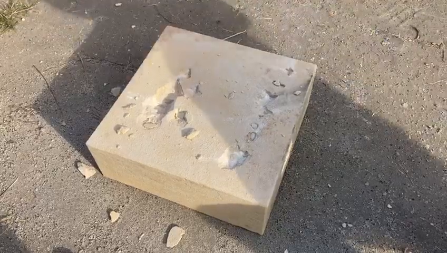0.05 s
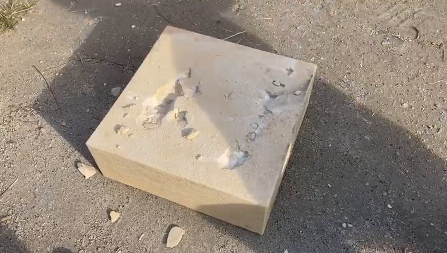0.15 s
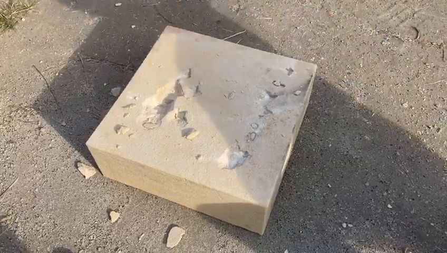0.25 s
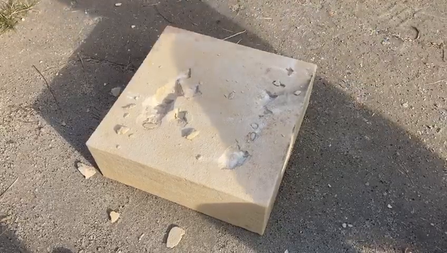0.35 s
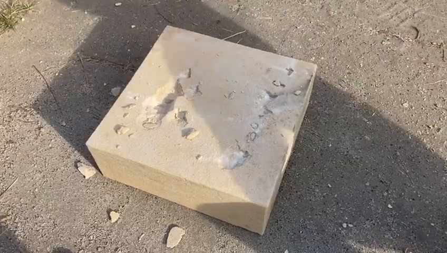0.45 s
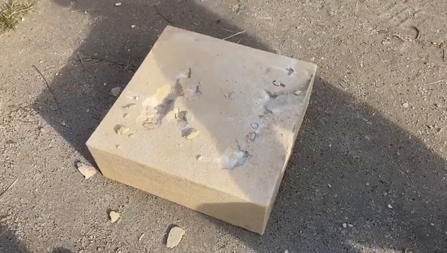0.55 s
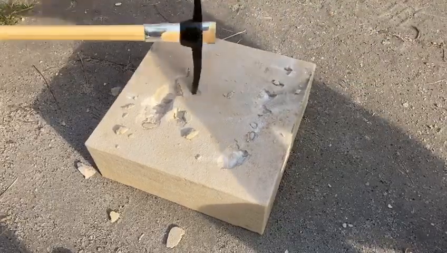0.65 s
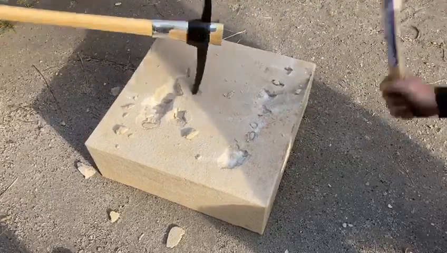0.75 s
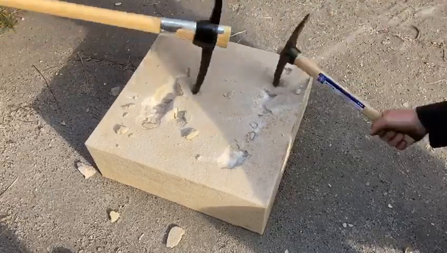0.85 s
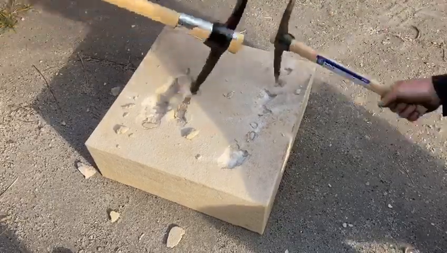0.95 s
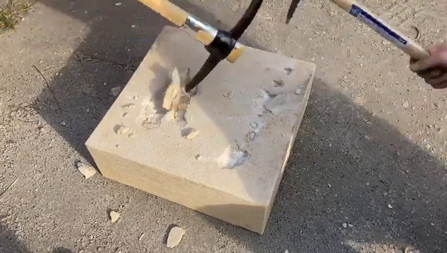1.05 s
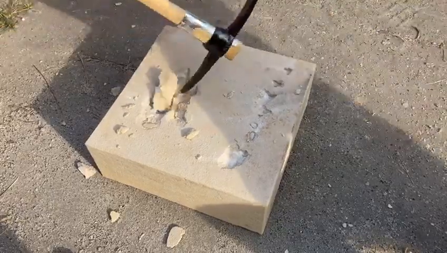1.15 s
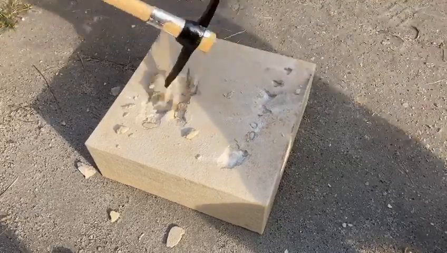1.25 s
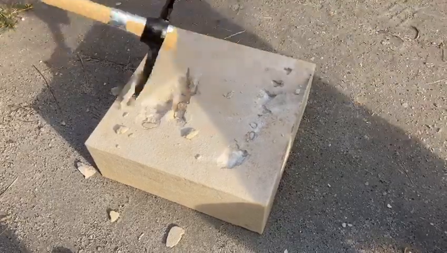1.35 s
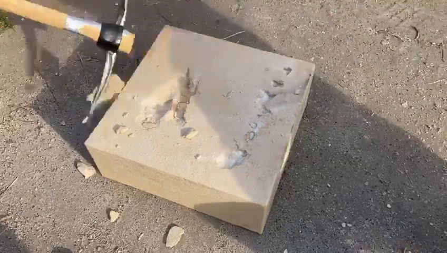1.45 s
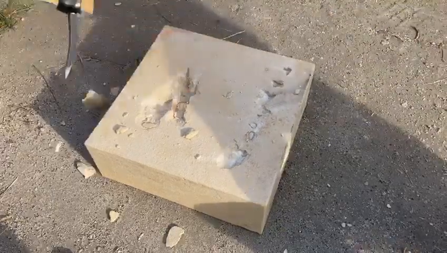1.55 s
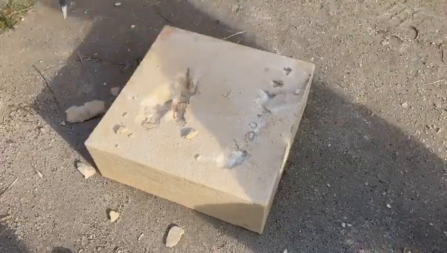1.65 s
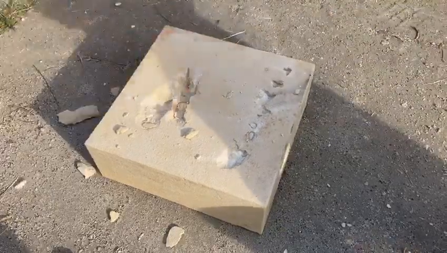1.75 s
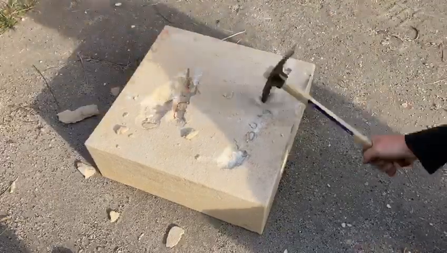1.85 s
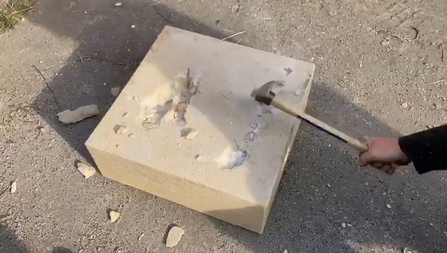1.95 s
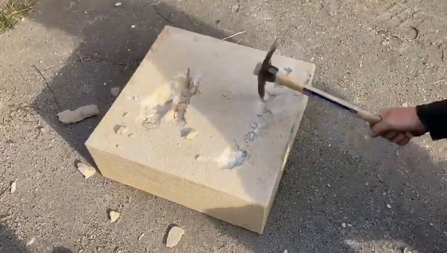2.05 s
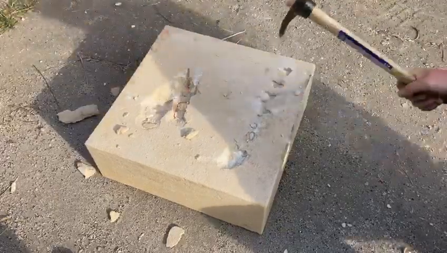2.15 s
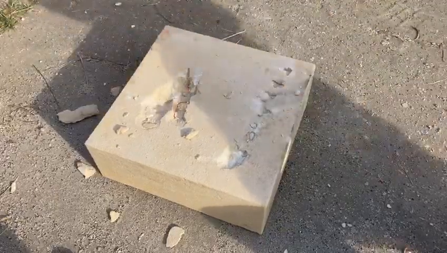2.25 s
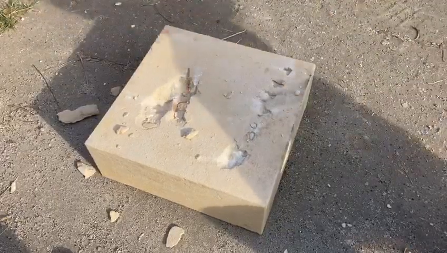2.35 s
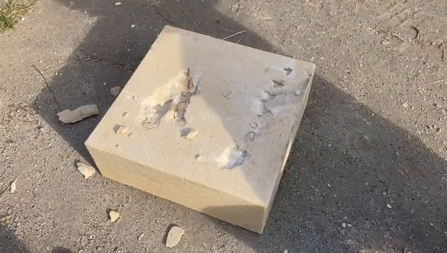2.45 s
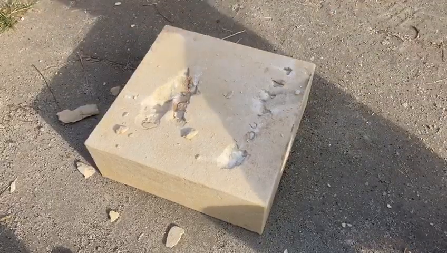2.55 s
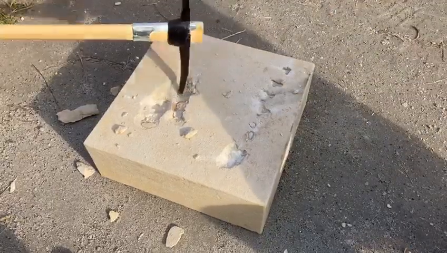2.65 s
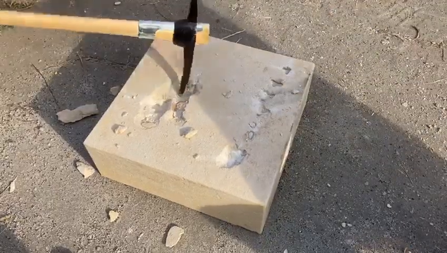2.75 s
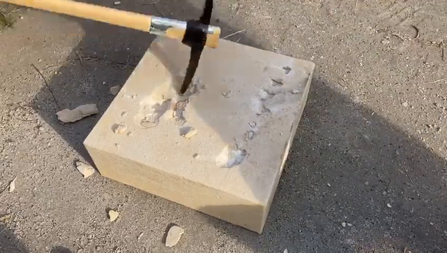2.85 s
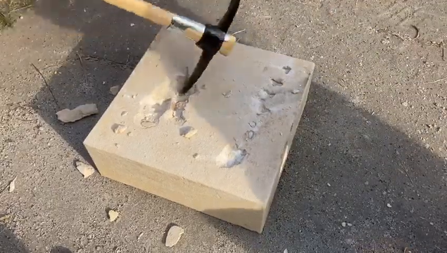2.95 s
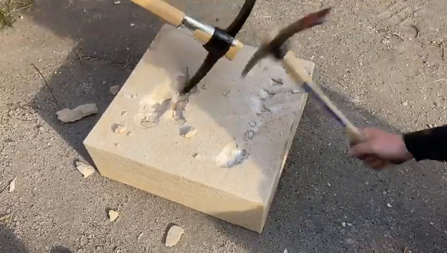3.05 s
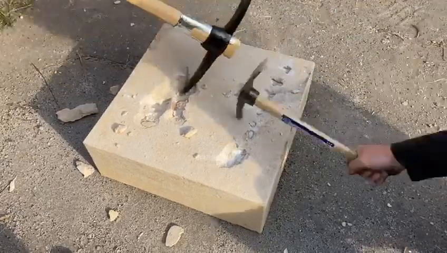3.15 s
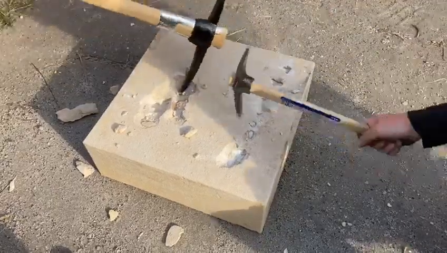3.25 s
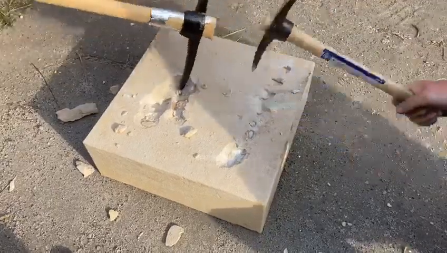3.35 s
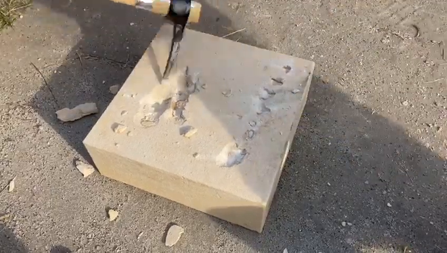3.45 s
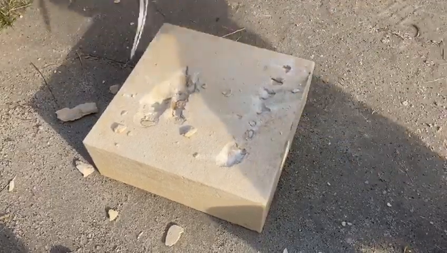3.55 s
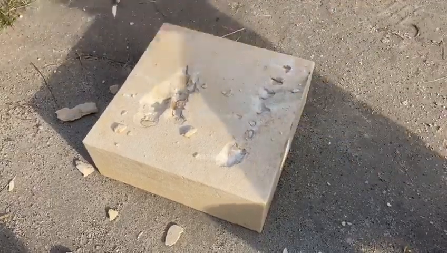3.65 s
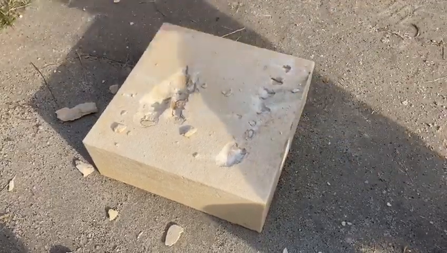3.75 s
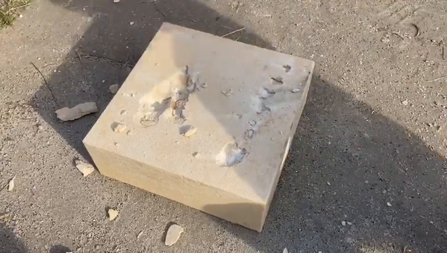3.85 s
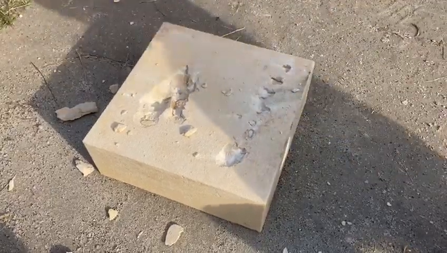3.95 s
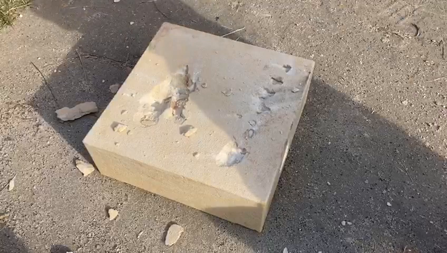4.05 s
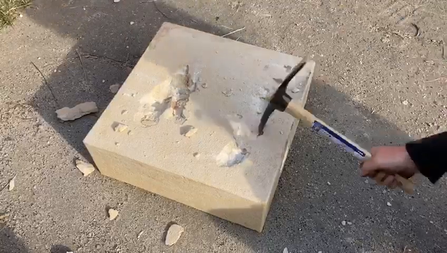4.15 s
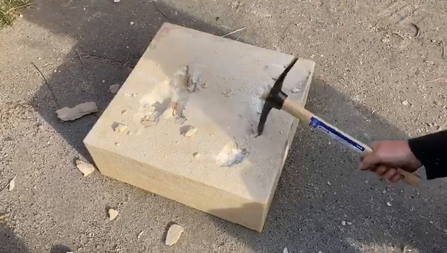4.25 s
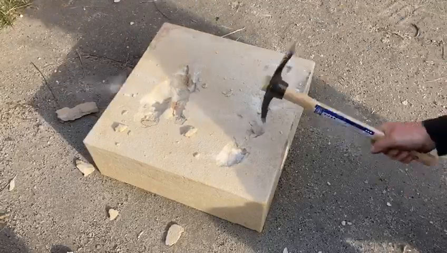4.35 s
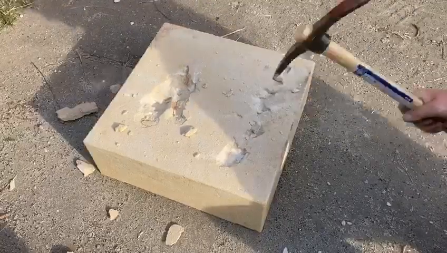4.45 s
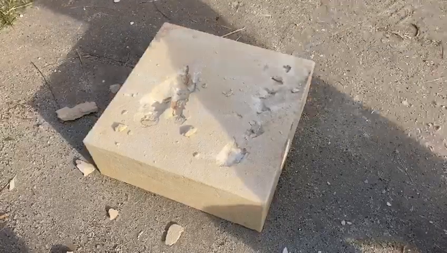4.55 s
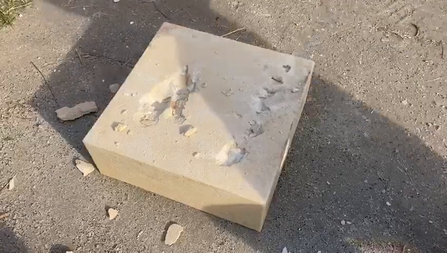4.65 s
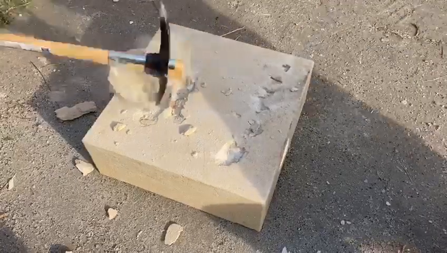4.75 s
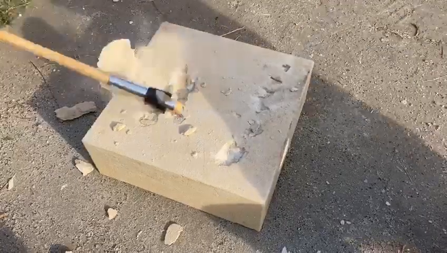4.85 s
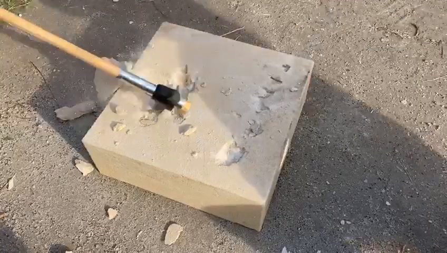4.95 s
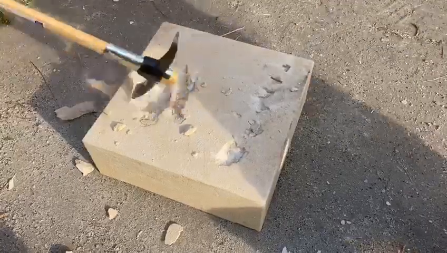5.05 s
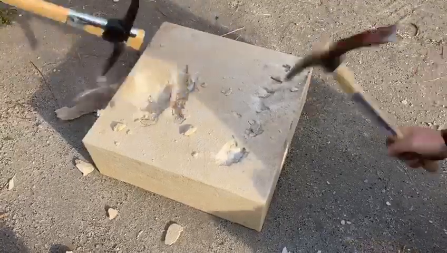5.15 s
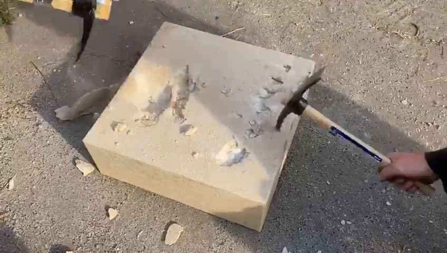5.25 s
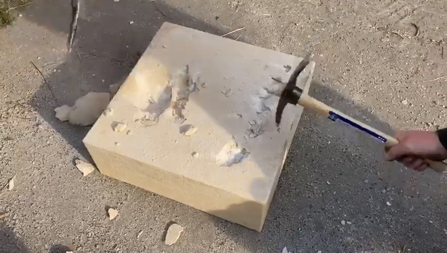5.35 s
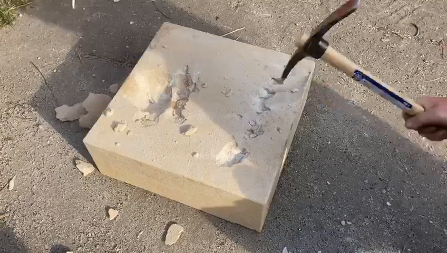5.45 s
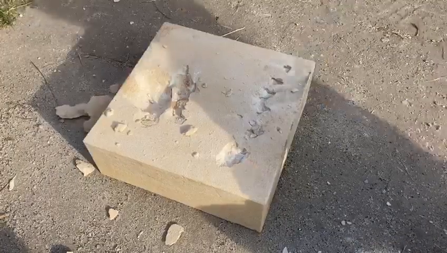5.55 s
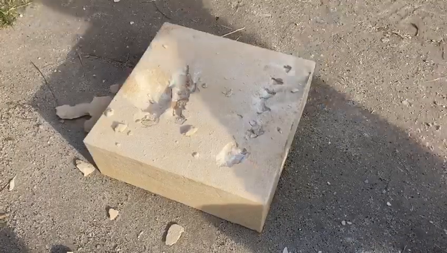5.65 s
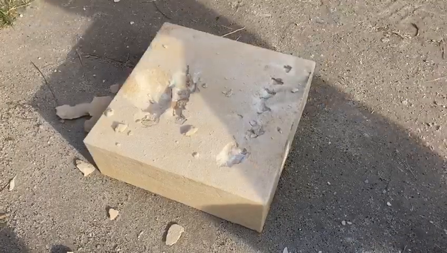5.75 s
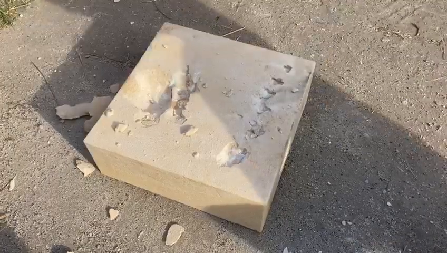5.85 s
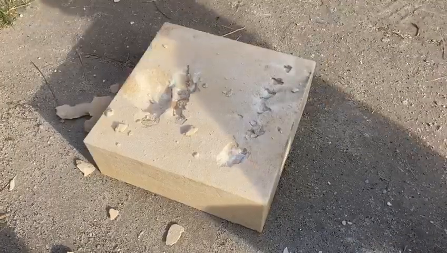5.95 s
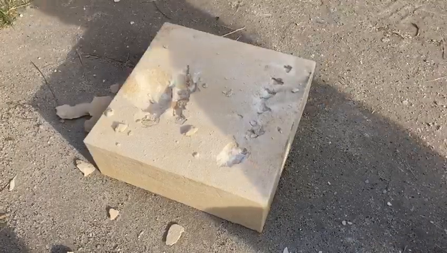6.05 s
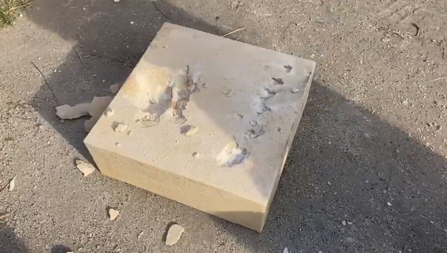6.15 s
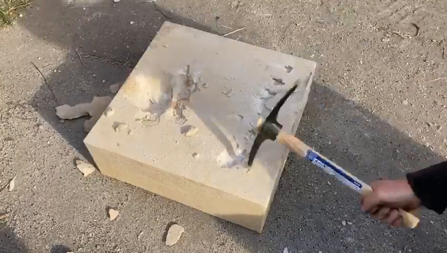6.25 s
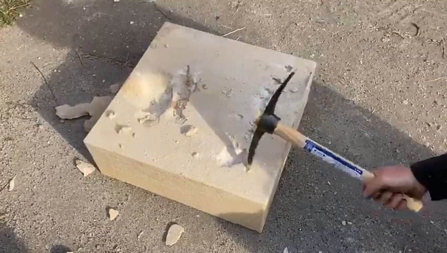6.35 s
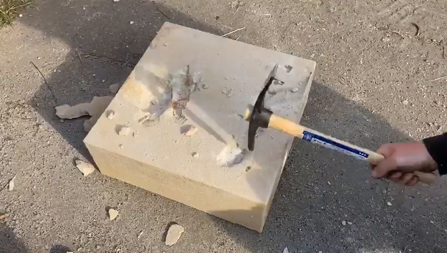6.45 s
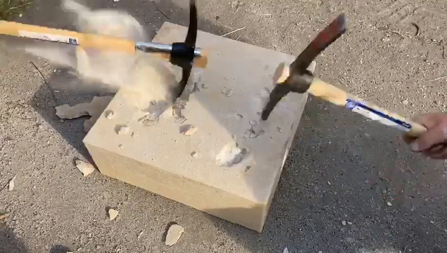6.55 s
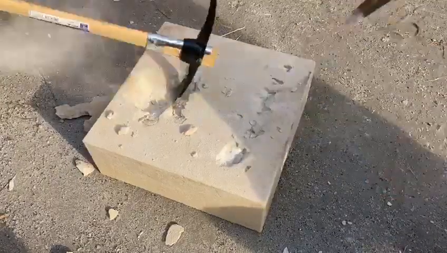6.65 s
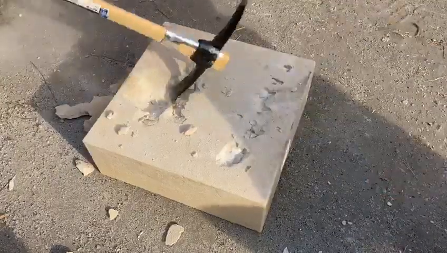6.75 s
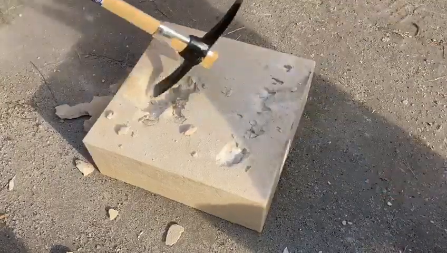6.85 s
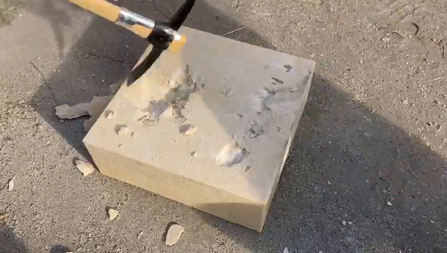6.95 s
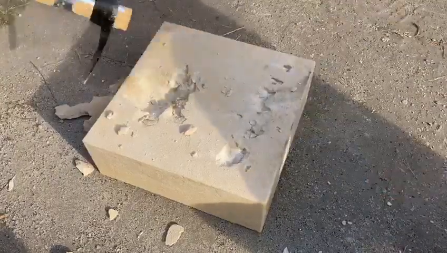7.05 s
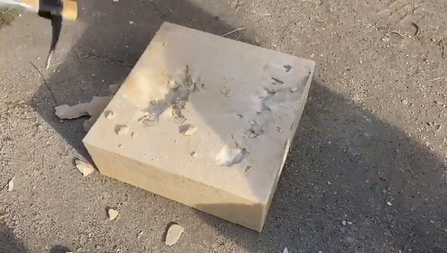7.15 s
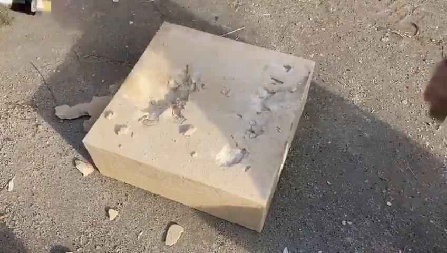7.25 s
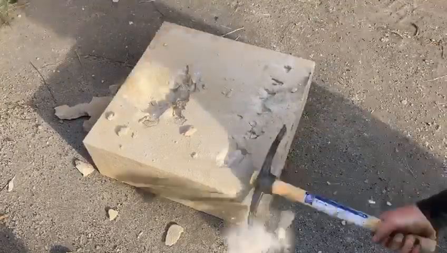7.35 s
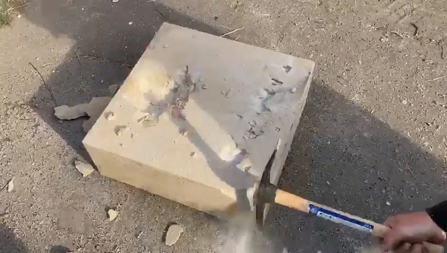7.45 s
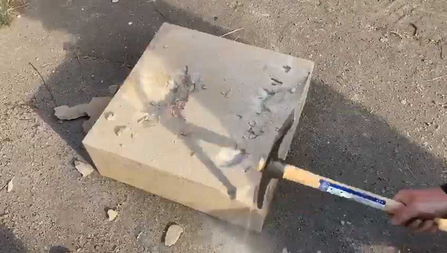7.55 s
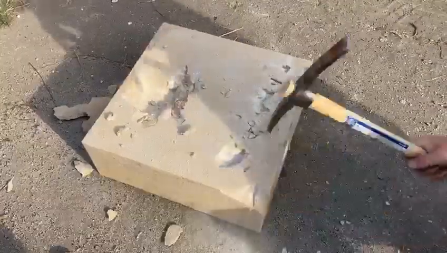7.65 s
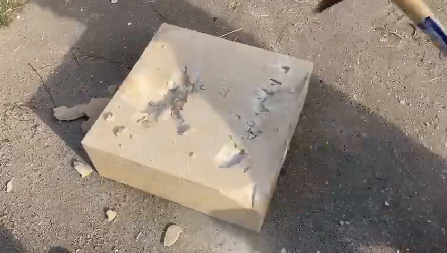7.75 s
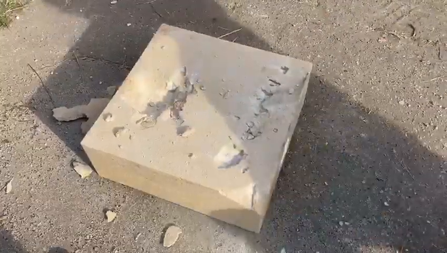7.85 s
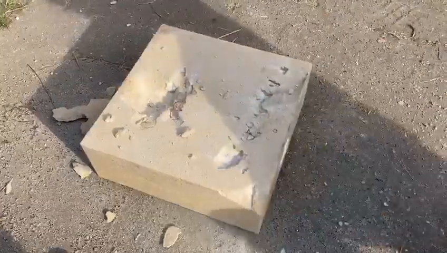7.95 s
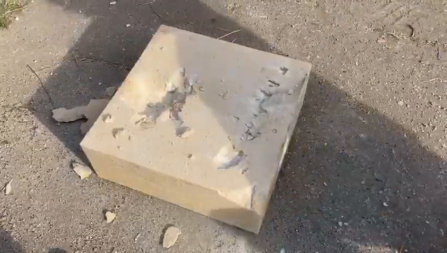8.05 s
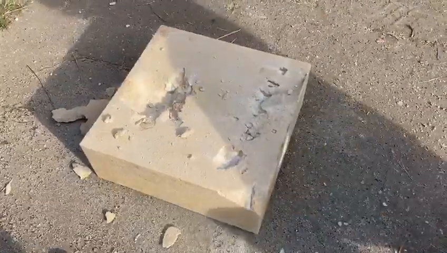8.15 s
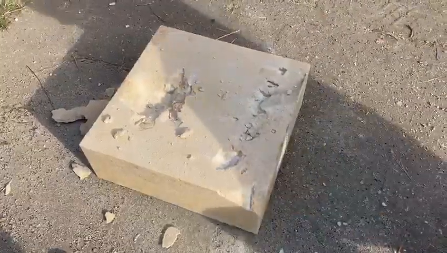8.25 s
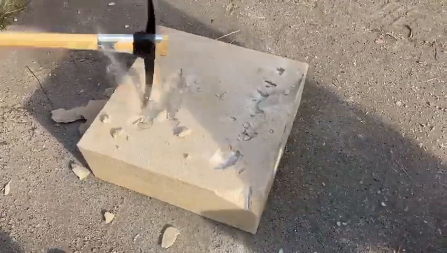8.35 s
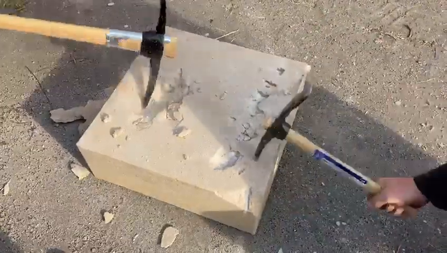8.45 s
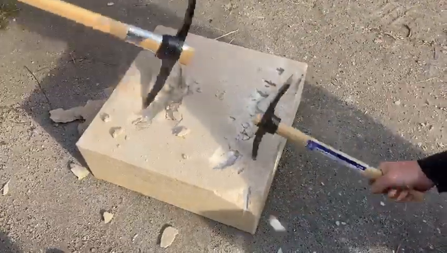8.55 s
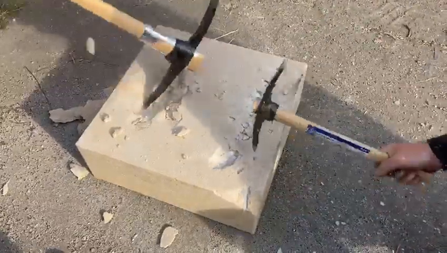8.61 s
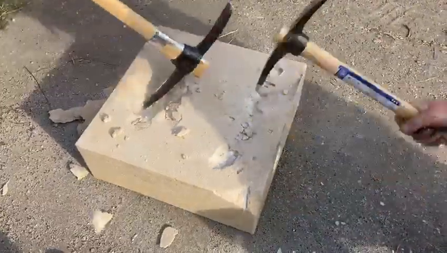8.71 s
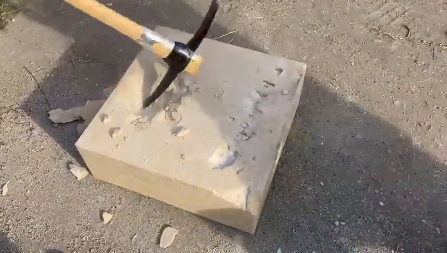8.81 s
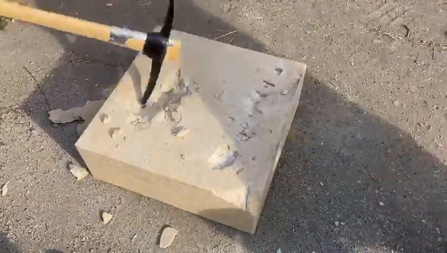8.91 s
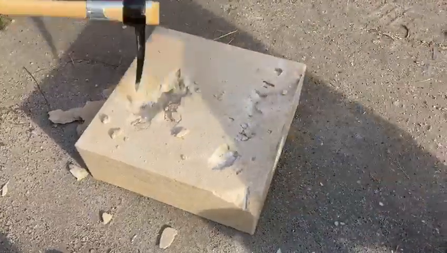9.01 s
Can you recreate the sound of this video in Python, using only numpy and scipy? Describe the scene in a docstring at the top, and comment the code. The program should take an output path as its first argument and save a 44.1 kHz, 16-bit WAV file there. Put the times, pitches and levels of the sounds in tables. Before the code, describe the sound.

After a quiet moment of low outdoor rumble and a soft sleeve swish, two quick pickaxe blows hit stone, followed by rough scraping and falling chips. More blows come singly or in close pairs, with pauses of trickling dust, soft cloth movement and thin ringing steel. The sound is close, dry and wide, with a very short open-air echo.

```python
"""A low outdoor rumble and a faint steel ring come first, then a swish of sleeves, then the first pickaxe blow.
Two steel pickaxes, one heavy and one light, work on a stone block on open ground, close to a microphone pair.
Shaped noise makes the crack, crunch and thud of each blow; decaying tones make the knock of the block and the steel.
Grit flies, crumbs patter down, dust trickles and larger chips land, all made from short or flowing noise.
Between blows the heavy pick scrapes out of its hole, squeaks once and sings, and a faint tone swells once."""
import sys
import numpy as np
from scipy import signal
from scipy.fft import rfft, irfft
from scipy.io import wavfile
from scipy.ndimage import uniform_filter1d

SR = 44100
rng = np.random.default_rng(int(sys.argv[2]) if len(sys.argv) > 2 else 0)


def pcm_store(signal):
    """Save signal as 16-bit PCM."""
    levels = np.round(np.clip(np.atleast_2d(signal), -1, 1) * 32767)
    wavfile.write(sys.argv[1], SR, levels.astype(np.int16).T)


N = 400428  # length of the scene [samples]

# One row a blow; the spot that is hit sets the block's pitch and how its groups of modes answer:
# (time [s], pick, deep, low, middle and high knock [dB], block pitch [factor],
#  bite fade [s], crunch [dB], steel ring [dB], debris [dB])
BLOWS = [ (0.6818, "light", -7, 3.5, -10, -4.5, 1.136, 0.0035, -13, -48, -41.5),
         (0.8553, "heavy", -2.5, -3, -2, -7.5, 1.034, 0.0054, -14.5, -61.5, -45),
         (1.9205, "light", -1.5, -.5, -.5, -6.5, 1.026, 0.0051, -11.5, -29, -41.5),
         (2.6958, "heavy", -0.5, 0.5, 0.5, 0.5, 1.02, 0.0099, -14, -53, -44),
         (3.1434, "heavy", -4, -1, -7.5, -2, 1.016, 0.0035, -7.5, -38.5, -51.5),
         (4.2096, "light", -4, -2.5, -4, -29, 1.014, 0.0038, -17, -29, -65.5),
         (4.7741, "heavy", -6.5, -2, -2, -7.5, 0.97, 0.016, -13, -34, -40),
         (5.2454, "light", -2.5, 1, -5.5, -4.5, 1.06, 0.0049, -15.5, -38, -37),
         (6.3116, "light", -4.5, 1.5, -4.5, 0.5, 1.007, 0.0029, -13.5, -30, -45),
         (6.5765, "heavy", -4.5, -1, .5, -8.5, 1.0, 0.008, -8.5, -48, -40),
         (7.3871, "light", -9, -6, -6.5, -7, 1.085, 0.0017, -6.5, -16.5, -34),
         (8.3810, "light", -6, -1, 1, -2, 0.98, 0.011, -14, -45.5, -43),
         (8.507, "heavy", -4, -2, -3, -10.5, 1.01, 0.0053, -13, -52, -47)]
# Steel dragged over stone: (peak time [s], level [dB], swell [s])
SCRAPES = [ (1.023, -24.5, .026), (1.122, -26.5, 0.0025), (1.242, -32, .003), (1.333, -17, 0.0038),
           (1.366, -20.5, 0.0028), (1.41, -33, .006), (1.452, -23.5, 0.0025), (3.30, -38, 0.019),
           (3.485, -23.5, 0.03), (4.812, -27, 0.025), (5.039, -33.5, 0.043), (5.149, -23, 0.01),
           (6.75, -39.5, 0.033), (6.814, -29, 0.042), (6.874, -29.5, 0.0084), (9.026, -26, 0.025)]
# The heavy head sings as it comes free or is jolted: (time [s], starting level [dB], length [s])
SINGING = [(0, -57, 1.3), (1.005, -39.5, .17), (1.259, -35, 0.58), (1.921, -49.5, .5), (2.433, -52, 0.68),
           (3.481, -43.5, .97), (5.155, -40.5, 1.23), (6.925, -43, 0.47), (8.995, -37.5, .3)]
# The point squeaks as it is eased out: (peak time [s], pitch [Hz], level [dB], half length [s])
SQUEAKS = [(6.485, 1510, -46, .014)]
# The larger chips landing: (time [s], click [dB], clack [dB])
CHIPS = [(1.642, -21, -42), (1.701, -33, -38.5), (1.716, -29.5, -42), (3.522, -16, -30.5), (4.1, -50, -65),
         (4.555, -41, -55), (4.905, -32, -41), (5.125, -28.5, -34), (5.474, -26, -39.5), (5.86, -39, -44),
         (7.204, -38, -31), (7.508, -32, -43), (7.55, -23.5, -35), (7.588, -25.5, -43), (7.614, -33, -40),
         (7.638, -31, -26.5), (7.666, -32, -35), (7.683, -23, -30.5), (8.041, -48, -45),
         (8.081, -54, -42.5)]
# Sleeves swish as a pick is lifted or worked loose: (peak time [s], level [dB], half length [s])
SWISHES = [(0.206, -46.5, 0.06), (1.983, -47, 0.11), (2.227, -50, 0.041), (3.027, -42.5, 0.1),
           (3.383, -43, 0.044), (4.247, -44, .066), (6.027, -49.5, 0.082), (6.746, -37.5, 0.04),
           (7.868, -47, 0.09), (8.713, -43, 0.052)]

# Tones of the block in four groups, deep to high, before pitch and level vary:
# (frequency [Hz], level [dB], time to fall 60 dB [s])
BLOCK_MODES = [
    [(164.2, -2.5, 0.054), (221.7, -4.5, 0.055)],
    [(365, 2.5, 0.025), (433.7, -1, 0.024)],
    [(585.3, -2, 0.054)],
    [(793, -0.5, 0.011), (848, -3.5, 0.03), (999, -9.5, 0.033), (1242, -9, 0.032)],
]
# Tones of each steel head, before pitch and level vary: (frequency [Hz], level [dB], time to fall 60 dB [s])
HEAD_MODES = { "heavy": [(1260, -6, .12), (2210, -8, .1), (3332, 0, .13), (3760, -8, .1), (4640, -12, .2),
              (6815, -10, .15), (7612, -10, .2), (8330, -6, .12)], "light": [(614, -2, .16), (1491, 0, .11),
              (1900, -16, .2), (3036, -5, .11), (4600, -24, .14), (6585, -11, .14), (7420, -13, .14),
              (10930, -18, .16)]}
# Resonances of the scraping point: (frequency [Hz], width [Hz], relative level [dB])
POINT_RESONANCES = [(1026, 40, 12.5), (1300, 55, 12.5), (1640, 140, -3.5), (2213, 250, 12), (3100, 36, 6.5),
                    (3310, 220, 15.5), (3803, 150, 9.5), (4730, 71, 13.5), (6665, 200, 10.5),
                    (7700, 180, -0.5), (7970, 430, 5.5), (7950, 85, 10.5), (9930, 140, 15.5),
                    (9350, 68, -22.5), (10500, 470, -13.5)]

# Noise colours, each a list of (frequency [Hz], relative level [dB per Hz]):
# the surface cracking
CRACK_COLOUR = [(300, -1.5), (1500, 6), (3500, -19.5), (5000, 0.5), (5700, -11), (7200, 3), (9000, -1),
                (11500, 3.5), (13000, -22)]
# stone being crushed
CRUNCH_COLOUR = [(100, -22.5), (500, 1), (900, 4.5), (1400, -0.5), (2000, 3.5), (2900, -4.5), (3800, -2.5),
                 (5600, -15.5), (8000, -13), (12000, -39.5)]
# the block pushed into the ground
THUD_COLOUR = [(20, -27), (45, -5.5), (85, 6.5), (130, -3.5), (220, -7.5), (320, -5.5), (450, -37.5),
               (800, -21.5), (3000, -58)]
# flying grit; dust and sleeves use it too
GRIT_COLOUR = [(200, -32.5), (900, 5.5), (1500, -2), (2400, 7), (3800, 5.5), (5000, 5), (5700, 0),
               (7300, 9), (8800, -2.5), (10300, 5.5), (11500, 4.5), (13000, -36)]
# the bright click of a landing chip or crumb
CLICK_COLOUR = [(300, -26.5), (1500, -10), (2500, -6.5), (4500, 0), (5800, -4), (7200, 2), (8700, 1),
                (10500, 5), (12000, -1)]
# the duller clack of a landing chip or crumb
CLACK_COLOUR = [(100, -34), (400, -3.5), (800, 7.5), (1400, -1), (2500, 0.5), (5000, -22), (12000, -31)]
# the low outdoor rumble
AIR_COLOUR = [(12, -5.5), (28, -11.5), (45, -0.5), (85, 0.5), (150, -7), (300, -16.5), (500, -24),
              (800, -29), (1300, -40), (4000, -36), (12000, -122)]

# How fast the echo dies: (frequency [Hz], time to fall 60 dB [s])
ECHO_DECAY = [(60, 1), (250, 0.32), (600, 0.21), (2000, 0.35), (10000, 0.16)]
# How alike the two microphones sound: (frequency [Hz], likeness [-1 to 1])
LIKENESS = [(50, .99), (300, .97), (700, .92), (1200, .55), (2000, .3), (4000, .3), (6000, .5), (7200, .85),
            (11000, .85), (12000, .65)]
# How far the left microphone leads: (frequency [Hz], phase [radians])
LEAD = [(50, 0), (700, .2), (1300, .9), (2200, 0), (3900, -.6), (5200, -3), (6600, -.1), (7500, -.7),
        (8900, -3), (10000, -4), (11000, -5.6), (12000, -6.1)]
# How much louder the left microphone is: (frequency [Hz], left minus right [dB])
BALANCE = [(300, 0), (700, .3), (1200, 3.5), (2500, 2.8), (4000, .2), (12000, -.4)]

# The first crack of each pick: {pick: level [dB]}
CRACK_DB = {"heavy": -13.5, "light": -16.5}
# Brightness of each head's ring: {pick: tilt [dB per octave]}
RING_TILT_DB = {"heavy": 0.5, "light": -1}
# Dust trickling after a blow, relative to its debris: {pick: level [dB]}
DUST_DB = {"heavy": -9.5, "light": -15.5}

# A longer bite pushes the block harder into the ground
THUD_DB, USUAL_BITE_S, THUD_DB_PER_DOUBLING = -17.5, 0.0045, 4
# A slow drag also dies away more slowly: fade = base + factor * swell
SCRAPE_FADE_S, FADE_PER_SWELL = 0.01, 0.059
SING_RISE_S, SING_FADE_OUT_S = 0.067, 0.13
# Crumbs after the blow with most debris; they fall thickest after one flight, some sooner, some later
CRUMBS_DB = -43
FLIGHT_S, FIRST_FALL_S, LAST_FALL_S = 0.28, 0.05, 0.17
# Dust starts a moment after a blow and is soon spent
DUST_DELAY_S, DUST_RUN_S = 0.04, 0.63
ECHO_DB, AIR_DB = -15.5, -44.5
EDGE_HZ = 12350  # upper limit of the sound


def amp(db):
    """Turns decibels into a gain."""
    return 10 ** (np.asarray(db) / 20)


def evened(x):
    """Scales a signal to an rms (average strength) of 1."""
    return x / np.sqrt(np.mean(x ** 2) + 1e-20)


def evened_gain(response):
    """Finds the rms gain of a frequency response."""
    return np.sqrt(np.mean(abs(response) ** 2))


def read(points, hz):
    """Reads a table between its points on a log-frequency axis."""
    f, value = np.transpose(points)
    return np.interp(np.log(hz + 1), np.log(f + 1), value)


def add(mix, s, sound):
    """Mixes a sound in at time s [s], cut off at the end of the scene."""
    part = mix[:, max(round(s * SR), 0):][:, :sound.shape[1]]
    part += sound[:, :part.shape[1]]


def noise(colour, size, lumps_db=0, lump_hz=130):
    """Two noises of one colour, one shared by the microphones and one not; lumps are a fragment's own resonances."""
    hz = np.fft.rfftfreq(size, 1 / SR)
    bumps = rng.standard_normal(len(hz)).clip(-2, 2)
    lumps = np.interp(hz / lump_hz, np.arange(len(hz)), bumps)
    white = rfft(rng.standard_normal((2, size)))
    return evened(irfft(white * amp(read(colour, hz) + lumps_db * lumps), size))


def grains(depth_db, length, size):
    """Uneven gain, like stone breaking grain by grain; length is one grain [s]."""
    t = np.arange(size) / SR
    steps = rng.standard_normal(size).clip(-2, 2)
    return evened(amp(depth_db * np.interp(t / length, np.arange(size), steps)))


def burst(t, swell, fade):
    """Swells up to t = 0 and dies away after it, by a factor e in each given time [s]."""
    return np.exp(-np.where(t < 0, -t / max(swell, 1e-4), t / max(fade, 1e-4)))


def ring(modes, t, pitch, tilt_db, detune, rise_cycles):
    """Tones struck at t = 0; neighbours swing in opposite senses, and low ones build up slowly."""
    t, out = np.maximum(t, 0), 0
    for k, (hz, db, t60) in enumerate(modes):
        weight, shift, angle = rng.standard_normal(3).clip(-2, 2)
        turns = hz * pitch * (1 + detune * shift) * t
        rise = 1 - np.exp(-(turns / rise_cycles) ** 2)
        level = amp(db + weight + tilt_db * np.log2(hz / 2000) - 60 * t / t60) * rise
        phases = np.array([[0], [np.pi * angle]])  # the shared part and the part that differs
        out = out + (-1) ** k * level * np.sin(2 * np.pi * turns + phases)
    return out


def patchy(x, depth_db, count_frames, count_bins):
    """Shifts the colour at random from moment to moment, as a changing contact does."""
    z = signal.stft(x, nperseg=1024, noverlap=768)[2]
    field = rng.standard_normal(z.shape[1:])
    for _ in range(2):  # smooth twice over frequency and time
        field = uniform_filter1d(field, count_bins, 0)
        field = uniform_filter1d(field, count_frames, 1)
    gain = evened(amp(depth_db * evened(field)))
    return signal.istft(z * gain, nperseg=1024, noverlap=768)[1][:, :x.shape[1]]


def blows():
    """The point cracks the surface, crushes in and knocks the block, which thuds on the ground; grit flies."""
    out, lead = np.zeros((2, N)), 1 / 50
    t = np.arange(SR // 3) / SR - lead
    size = len(t)
    for s, pick, *knock_db, pitch, bite, crunch_db, ring_db, debris_db in BLOWS:
        crack = noise(CRACK_COLOUR, size)
        crack = crack * burst(t + 0.0012, 0.00078, 0.0036) * grains(3.7, 0.0007, size)

        crunch = noise(CRUNCH_COLOUR, size, lumps_db=4, lump_hz=109.8)
        crunch = crunch * burst(t - 0.001, 0.0022, bite) * grains(2.2, 0.001, size)

        knock = 0
        for db, modes in zip(knock_db, BLOCK_MODES):
            knock = knock + amp(db) * ring(modes, t, pitch, 0, detune=0.006, rise_cycles=0.7)

        thud = noise(THUD_COLOUR, size) * burst(t - 0.009, 0.0034, 0.022)
        thud_db = THUD_DB + THUD_DB_PER_DOUBLING * np.log2(bite / USUAL_BITE_S)

        steel = ring(HEAD_MODES[pick], t, 0.97, RING_TILT_DB[pick], detune=0.0008, rise_cycles=5.9)

        grit = noise(GRIT_COLOUR, size, lumps_db=7) * (t > 0)
        grit = grit * burst(t - 0.028, 0.02, 0.014) * grains(3.5, 0.002, size)

        stone = amp(CRACK_DB[pick]) * crack + amp(crunch_db) * crunch + knock
        blow = stone + amp(thud_db) * thud + amp(ring_db) * steel + amp(debris_db) * grit
        add(out, s - lead, blow)
    return out


def scrapes():
    """The point catches and slips on coarse grains, through the resonances of the steel."""
    t, hz = np.arange(N) / SR, np.fft.rfftfreq(N, 1 / SR)
    pressure = 0
    for s, db, swell in SCRAPES:
        fade = SCRAPE_FADE_S + FADE_PER_SWELL * swell
        pressure = pressure + amp(db) * burst(t - s, swell, fade)
    rubbing = patchy(rng.standard_normal((2, N)), 6.24, 7, 2)
    friction = rubbing * grains(3.6, 0.0012, N) * pressure
    steel = sum(amp(db) / (1 + 2j * (hz - f) / width) for f, width, db in POINT_RESONANCES)
    return irfft(rfft(friction) * steel / evened_gain(steel), N)


def chips():
    """Each chip lands with a bright click and a duller clack, coloured by its own shape."""
    out, lead = np.zeros((2, N)), 1 / 100
    t = np.arange(SR // 10) / SR - lead
    size = len(t)
    for s, click_db, clack_db in CHIPS:
        click = noise(CLICK_COLOUR, size, lumps_db=4, lump_hz=300)
        click = click * burst(t, 0.0005, 0.003) * grains(2.5, 0.0008, size)
        clack = noise(CLACK_COLOUR, size, lumps_db=5) * burst(t - 0.001, 0.0005, 0.006)
        add(out, s - lead, amp(click_db) * click + amp(clack_db) * clack)
    return out


def singing(hz=932, t60=2.77, beat_hz=3.12, partner_db=-13):
    """The two arms of the heavy head ring like a tuning fork; each tone fades out at the end of its given length."""
    out = np.zeros((2, N))
    for s, db, length in SINGING:
        t = np.arange(int(length * SR)) / SR
        rise = np.minimum(t / SING_RISE_S, 1)
        fade_out = np.minimum((length - t) / SING_FADE_OUT_S, 1)
        level = amp(db - 60 * t / t60) * rise * fade_out
        # a weaker partner slightly higher in pitch makes the tone beat
        beating = 1 + amp(partner_db) * np.exp(2j * np.pi * beat_hz * t)
        tone = np.exp(2j * np.pi * hz * t) * beating
        add(out, s, level * np.array([tone.real, tone.imag]))
    return out


def squeaks(octave_db=0, sag=0.028):
    """Steel sticks and slips on stone: a brief wavering tone and its octave, sagging in pitch."""
    out, lead = np.zeros((2, N)), 1 / 10
    t = np.arange(SR // 5) / SR - lead
    for s, hz, db, half in SQUEAKS:
        pitch = hz * (1 - sag * t / lead) * grains(0.038, 0.0041, len(t))
        turns = np.cumsum(pitch) / SR
        tone = np.exp(2j * np.pi * turns) + amp(octave_db) * np.exp(2j * np.pi * 2 * turns)
        swell = np.exp(-(t / half) ** 2)
        add(out, s - lead, amp(db) * swell * np.array([tone.real, tone.imag]))
    return out


def crumbs(per_s=130):
    """Crumbs thrown by each blow tick on the ground at random, most of them about one flight later."""
    t = np.arange(N) / SR
    most_db = max(row[-1] for row in BLOWS)
    fall = 0
    for s, *_, debris_db in BLOWS:
        level_db = CRUMBS_DB + 2 * (debris_db - most_db)  # twice the debris difference
        fall = fall + amp(level_db) * burst(t - s - FLIGHT_S, FIRST_FALL_S, LAST_FALL_S)
    out, age = 0, np.arange(SR // 40) / SR
    colours = [(CLICK_COLOUR, 0), (CLACK_COLOUR, -3)]  # each with its level [dB]
    for colour, db in colours:
        landings = rng.random(N) < per_s / len(colours) / SR
        landings = landings * (1 + rng.exponential(1, N).clip(0, 3))  # uneven strengths
        tick = noise(colour, len(age)) * np.exp(-age / 0.003)
        out = out + amp(db) * signal.oaconvolve(landings[None], tick, axes=1)[:, :N]
    return evened(out) * fall


def dust(trickle_db=-71, scraped_db=-24, scraped_fade=0.094):
    """Fine dust runs off after every blow and scrape and thins to a faint steady trickle."""
    t = np.arange(N) / SR
    struck = 0
    for s, pick, *_, debris_db in BLOWS:
        run = (t > s + DUST_DELAY_S) * np.exp(-((t - s) / DUST_RUN_S) ** 2)
        struck = struck + amp(debris_db + DUST_DB[pick]) * run
    scraped = sum(amp(db + scraped_db) * burst(t - s, swell, scraped_fade) for s, db, swell in SCRAPES)
    flow = np.sqrt(amp(trickle_db) ** 2 + struck ** 2 + scraped ** 2)
    return patchy(noise(GRIT_COLOUR, N), 5.5, 14, 7) * flow * grains(3.5, 0.003, N)


def sleeves():
    """Cloth rubs on cloth in a soft hiss that swells and falls with the arm."""
    t = np.arange(N) / SR
    speed = sum(amp(db) * np.exp(-((t - s) / half) ** 2) for s, db, half in SWISHES)
    return patchy(noise(GRIT_COLOUR, N) * speed * grains(1.5, 0.004, N), 4, 14, 9)


def faint_tone(s=6.03, half=0.22, hz=715, width_hz=25, db=-57):
    """A faint wavering tone, made of narrow-band noise, swells once in the background."""
    t, f = np.arange(N) / SR, np.fft.rfftfreq(N, 1 / SR)
    band = np.exp(-((f - hz) / width_hz) ** 2)
    tone = evened(irfft(rfft(rng.standard_normal(N)) * band, N))
    return amp(db) * tone * np.exp(-((t - s) / half) ** 2)


def yard(x):
    """A short scatter from the ground and things nearby, each band dying at its own speed."""
    size = SR // 2
    rise = np.minimum(np.arange(size) / SR / 0.006, 1) ** 2
    taps = rng.standard_normal((2, size)) * (rng.random((2, size)) < 0.08) * rise
    hz, t, z = signal.stft(taps, SR, nperseg=256)
    decay = amp(-60 * t / read(ECHO_DECAY, hz)[:, None])
    tail = signal.istft(z * decay, SR, nperseg=256)[1]
    return signal.fftconvolve(x[:1], tail / np.linalg.norm(tail[0]), axes=1)[:, :N]


def outdoor_rumble():
    """Steady noise, strongest in the bass, with a slowly wavering level."""
    return amp(AIR_DB) * noise(AIR_COLOUR, N) * grains(1, 0.15, N)


def microphones(x):
    """Two close microphones: alike in the bass, with a phase difference that turns in the treble."""
    hz = np.fft.rfftfreq(N, 1 / SR)
    same = np.clip(read(LIKENESS, hz), -1, 1)
    shared, apart = rfft(x) * np.sqrt([(1 + same) / 2, (1 - same) / 2])
    # half the level and phase difference goes to each side
    port = amp(read(BALANCE, hz) / 2) * np.exp(0.5j * read(LEAD, hz))
    return irfft(np.array([(shared + apart) * port, (shared - apart) / port]), N)


def scene():
    """The work on the block with its echo, the singing steel, the faint tone and the outdoor rumble."""
    work = blows() + scrapes() + squeaks() + chips() + crumbs() + dust() + sleeves()
    echo = amp(ECHO_DB) * yard(work)
    return microphones(work + echo + singing() + faint_tone() + outdoor_rumble())


def record(dry):
    """The blows overload the input softly; then the highest treble is cut off."""
    squashed = np.tanh(dry)
    low_pass = signal.firwin(201, EDGE_HZ, window=("kaiser", 8), fs=SR)
    return signal.oaconvolve(squashed, low_pass[None], "same")


dry = scene()
out = record(dry)
pcm_store(out)
```